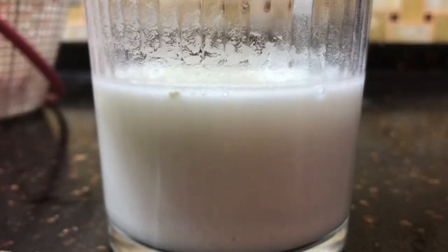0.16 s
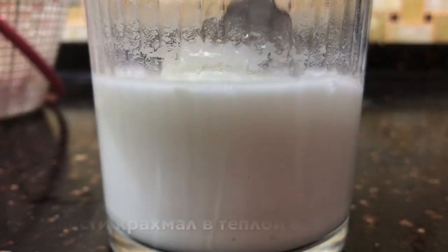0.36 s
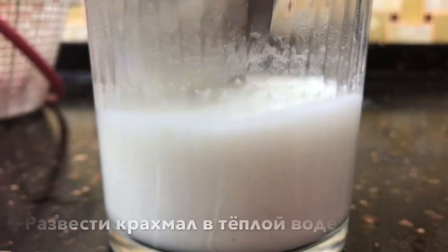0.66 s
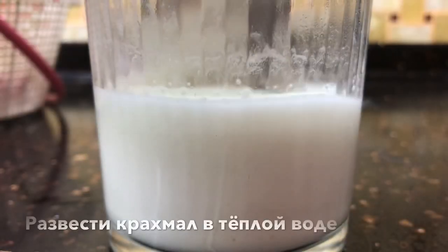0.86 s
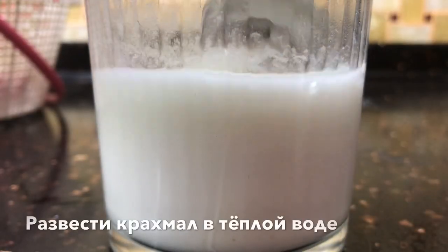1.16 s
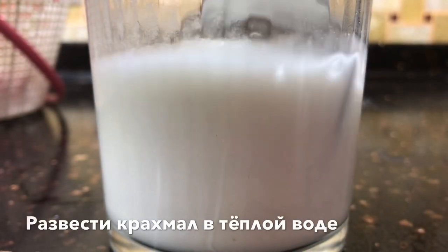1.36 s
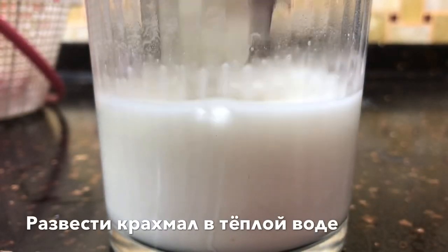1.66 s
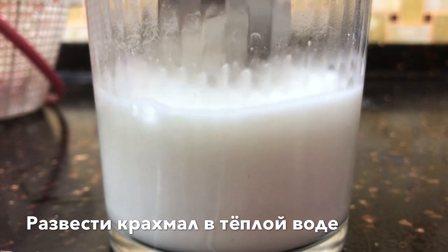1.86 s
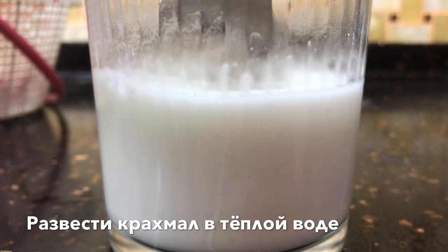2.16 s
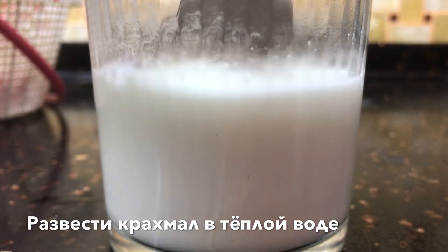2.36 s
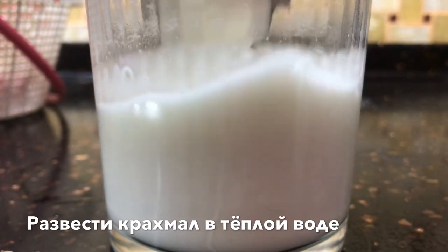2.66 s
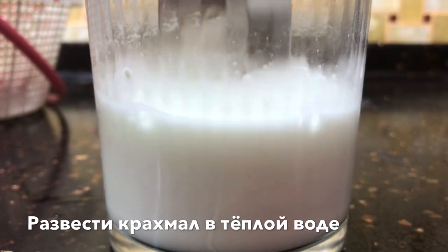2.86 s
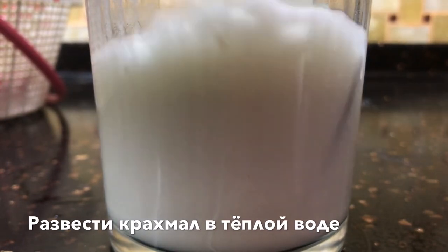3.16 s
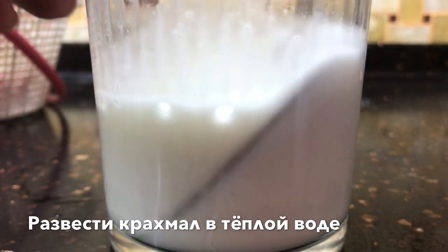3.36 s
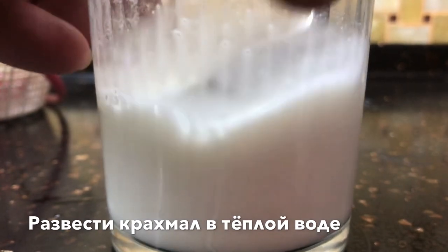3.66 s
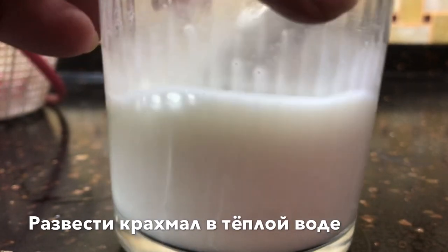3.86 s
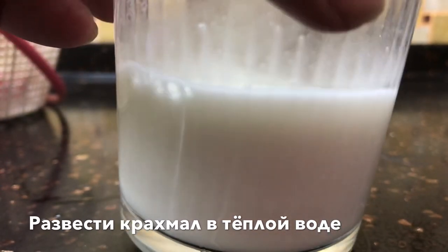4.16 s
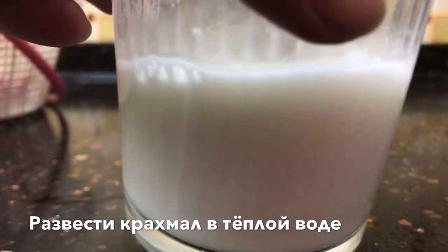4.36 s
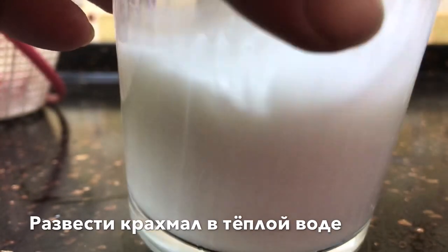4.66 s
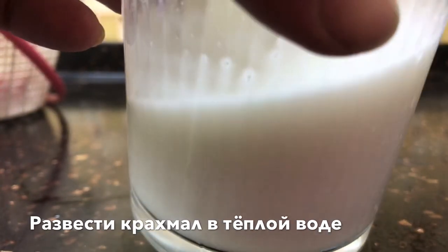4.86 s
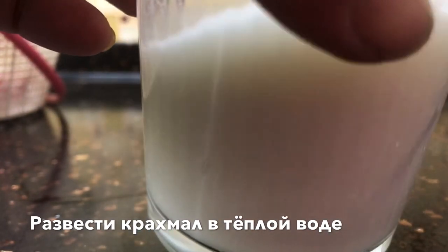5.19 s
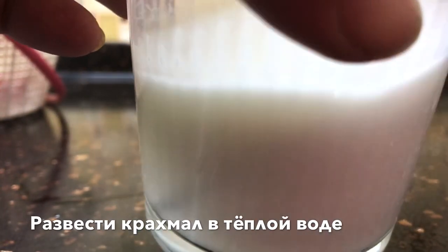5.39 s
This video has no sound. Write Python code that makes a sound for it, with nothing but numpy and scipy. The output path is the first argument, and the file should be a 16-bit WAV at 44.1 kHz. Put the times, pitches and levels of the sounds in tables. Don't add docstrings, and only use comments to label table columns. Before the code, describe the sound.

In a small home kitchen with low rumble, hum and a thin fan hiss, a steel spoon chatters brightly on a glass rim, then strikes the wall hard. Dull wet knocks follow, a cluster of light ticks and a scrape at mid-point, then louder clattering blows and a quick ratchet over the ribbed glass. Close microphone, mostly dry, with a faint room tail.

```python
import sys
import numpy as np
from scipy import signal
from scipy.fft import rfft, irfft, next_fast_len
from scipy.io import wavfile
from scipy.ndimage import uniform_filter1d, map_coordinates

SR = 44100
rng = np.random.default_rng(int(sys.argv[2]) if len(sys.argv) > 2 else 0)


def file_out(sig):
    cols = np.atleast_2d(sig).T
    lim = np.clip(cols, -1, 1)
    pcm = np.round(lim * 32767).astype(np.int16)
    wavfile.write(sys.argv[1], SR, pcm)


def convert_level_to_amplitude(level_db):
    exponent = np.asarray(level_db, float) / 20
    return 10 ** exponent


N = 243828


def unit(x):
    return x / np.sqrt(np.mean(x ** 2) + 1e-20)


def along(points, hz):
    f, v = np.transpose(points)
    return np.interp(np.log(hz + 1), np.log(f + 1), v, left=v[0], right=v[-1])


def curves(rows, silent=None):
    s, *cols = np.transpose(rows)
    t = np.arange(N) / SR
    return [np.interp(t, s, c, left=silent, right=silent) for c in cols]


def wobble(rate):
    knots = rng.standard_normal(int(N * rate / SR) + 4)
    return map_coordinates(knots, [np.arange(N) * rate / SR])


def filtered(x, response):
    m = next_fast_len(N + SR // 2)
    return irfft(rfft(x, m) * response(np.fft.rfftfreq(m, 1 / SR)), m)[:N]


def noise(spectrum):
    low_end, high_end = (spectrum[0][0] / 2, -120), (spectrum[-1][0] * 3, -120)
    closed = [low_end] + list(spectrum) + [high_end]
    return unit(filtered(rng.standard_normal(N), lambda hz: convert_level_to_amplitude(along(closed, hz))))


def resonances(peaks):
    def response(f):
        total = 0
        for k, (centre, width, db) in enumerate(peaks):
            peak = 1j * f * width / (centre * centre - f * f + 1j * f * width)
            total = total + (-1) ** k * convert_level_to_amplitude(db) * peak
        return total
    return response


def add(track, s, sound):
    track[round(s * SR):][:len(sound)] += sound


# (f/Hz, level/dB per Hz)
RUMBLE_COLOUR = [(25, -34), (40, -2), (55, 0.5), (70, 1.5), (81, 9), (92, -5), (110, 1), (130, -29)]
HUM_COLOUR = [(125, -7.5), (167, 1.5), (210, -5), (255, -3.5), (300, -3.5), (340, -12), (370, -4),
              (450, -11.5), (600, -8.5), (740, -18), (1030, -13.5), (1180, -20), (1330, -16.5), (1500, -28)]
HISS_COLOUR = [(1200, -55), (1600, 0), (2300, 0), (3200, 0), (4800, -3), (5300, 1.5), (6800, -1.5),
               (8200, -1), (9000, -0.5), (11500, -1), (13000, -3.5), (14400, -4.5), (15900, -5.5)]
# (f/Hz, width/Hz, level/dB)
FAN_BANDS = [(2210, 153, -8), (5270, 28, -5.5), (5360, 40, -6), (6540, 32, -7.5), (7320, 130, -7),
             (7570, 180, -10), (8050, 205, -7), (8550, 320, -11), (9450, 120, -14), (10200, 160, -13.5),
             (11026, 93.7, 0), (12870, 140, -9.5)]
# (t/s, level/dB)
FAN_WHISTLE = [
    (0, -60.5),
    (3.9, -62),
    (4.2, -70),
    (4.9, -76),
    (5.1, -62),
    (5.53, -67),
]
# (t/s, half-length/s, swell/dB)
GLASS_ROCKS = [
    (3.604, 0.078, 8.5),
    (5.095, 0.1, 5.5),
]


def fan_band(peaks):
    response = resonances(peaks)
    return unit(filtered(rng.standard_normal(N), lambda f: np.abs(response(f)) ** 1.84))


def kitchen_noise():
    t = np.arange(N) / SR
    swell_db = sum(db * np.exp(-((t - s) / half) ** 2) for s, half, db in GLASS_ROCKS)
    rumble_db = -51 + swell_db
    hum_db = -52.5 + 0.45 * swell_db
    rumble = convert_level_to_amplitude(rumble_db + 1.2 * wobble(5)) * noise(RUMBLE_COLOUR)
    hum = convert_level_to_amplitude(hum_db + 0.8 * wobble(7)) * noise(HUM_COLOUR)
    hiss = convert_level_to_amplitude(-63.5) * noise(HISS_COLOUR)

    upper_db, = curves(FAN_WHISTLE)
    lower_db = -67.5 + 2 * np.abs(t - 2.04)
    steady_bands = convert_level_to_amplitude(-67) * fan_band(FAN_BANDS[:8] + FAN_BANDS[11:])
    lower_bands = convert_level_to_amplitude(lower_db - 4) * fan_band(FAN_BANDS[8:10])
    upper_band = convert_level_to_amplitude(upper_db - 7.5) * fan_band(FAN_BANDS[10:11])
    flutter = convert_level_to_amplitude(1.1 * wobble(29.96))
    return rumble + hum + hiss + flutter * (steady_bands + lower_bands + upper_band)


# (f/Hz, t60/s)
KITCHEN_DECAY = [(200, 1), (2000, 0.37), (5000, 0.46), (12000, 0.2)]


def kitchen_echo(x):
    hz, t, z = signal.stft(rng.standard_normal(SR // 2), SR, nperseg=256)
    decay = convert_level_to_amplitude(-60 * t / along(KITCHEN_DECAY, hz)[:, None])
    tail = signal.istft(z * decay, SR, nperseg=256)[1]
    late = np.pad(x, (200, 0))
    diffuse = signal.fftconvolve(late, tail / np.linalg.norm(tail))[:N]
    return convert_level_to_amplitude(-20) * filtered(diffuse, lambda f: 1 / (1 + 1j * f / 3000))


# (t/s of most pressure, rise/s, fall/s, peak level/dB, upper modes/dB)
SLIDES = [
    (1.17, 0.12, 0.21, -51, -10),
    (3.051, 0.076, 0.12, -43, -6.5),
    (3.9, 0.12, 0.27, -68, 8),
    (5.089, 0.15, 0.073, -44, -1.5),
    (5.201, 0.13, 0.11, -48, -12),
]
# (f/Hz, width/Hz, level/dB)
SCRAPED_GLASS = [(504, 140, 2), (790, 90, 1.5), (1055, 130, 6.5), (1370, 120, -14)]
PRESSED_WALL = [(1900, 120, -2), (2910, 59, -4.5), (3300, 246, -9), (4600, 140, -8), (5770, 160, -1)]


def drag():
    grit = rng.standard_normal(N) * convert_level_to_amplitude(3.5 * wobble(260) + 1.8 * wobble(60))
    grains = unit(filtered(grit, lambda hz: 1 / (1 + 1j * hz / 3000) ** 3))
    lower, upper = np.zeros((2, N))
    for s, rise, fall, peak_db, upper_db in SLIDES:
        edge_db = peak_db - 21
        db, = curves([(s - rise, edge_db), (s, peak_db), (s + fall, edge_db)], silent=-120)
        lower += convert_level_to_amplitude(db + 10)
        upper += convert_level_to_amplitude(db + upper_db + 13)
    scrape = filtered(lower * grains, resonances(SCRAPED_GLASS))
    return scrape + filtered(upper * grains, resonances(PRESSED_WALL))


def strike(modes, part_db, life, soft=0.31, lag=0.):
    hz, db, t60 = np.transpose(modes)[..., None]
    t = np.clip(np.arange(SR // 4) / SR - lag / hz, 0, None)
    chance = rng.standard_normal((len(modes), 2))
    scatter_db, detune = 1.5 * chance[:, :1], 1 + 0.004 * chance[:, 1:]
    fade_db = -60 * t / (t60 * np.clip(life, 0.1, 3))
    size = convert_level_to_amplitude(db + part_db[:, None] + scatter_db + fade_db)
    rise = (1 - np.exp(-t * hz / soft)) ** 2
    return (size * rise * np.sin(2 * np.pi * hz * detune * t)).sum(axis=0)


def burst(lo_hz, hi_hz, db, t60):
    t = np.arange(SR // 8) / SR
    puff = rfft(rng.standard_normal(len(t)) * convert_level_to_amplitude(-60 * t / t60))
    flat = puff / uniform_filter1d(np.abs(puff), size=40)
    even = irfft(flat, len(t)) * convert_level_to_amplitude(-30 * t / t60)
    band = signal.butter(3, [lo_hz, hi_hz], "bandpass", fs=SR, output="sos")
    sound = signal.sosfilt(band, even)
    return np.pad(convert_level_to_amplitude(db) * sound / np.abs(sound).max(), (0, SR // 4 - len(t)))


def push(hz, db):
    cycles = np.arange(SR // 50) / SR * hz
    return convert_level_to_amplitude(db) * np.sin(2 * np.pi * cycles) * cycles ** 2 * np.exp(-3 * cycles)


# (t/s, peak level/dB, counter/dB, bright/dB)
FLOOR_THUDS = [
    (0.827, -28, -2.5, -40),
    (0.835, -33.5, 4, -32),
    (1.07, -23, 6.5, -56),
    (1.711, -26, -28, -27),
    (2.93, -28, 13, -46),
    (3.612, -30.5, -10, -34),
    (5.326, -44, 8, -29),
    (5.344, -39.5, 8, -28),
]
# (t/s, peak level/dB, rim ring/dB, bright/dB)
SURFACE_TICKS = [(3.036, -38.5, -10, -42), (3.087, -37, -6, -14), (3.158, -39, -2.5, -18),
                 (3.18, -44, -1, -22), (3.232, -46, -1.5, -18), (3.259, -44.5, 1, -21),
                 (3.281, -41, -13, -30), (3.311, -38.5, -4.5, -22), (3.339, -33.5, -6.5, -33),
                 (3.682, -57, -4, 3.5), (4.166, -54.5, -19, 4.5), (4.351, -48.5, -10, -11),
                 (4.373, -46.5, -2.5, -11), (4.419, -42, -4.5, -10), (4.444, -47, -11, -14),
                 (4.468, -44.5, -25, -23)]
# (t/s, peak level/dB)
RIB_KNOCKS = [(5.052, -31), (5.069, -28.5), (5.086, -33), (5.104, -36), (5.124, -29.5), (5.142, -26),
              (5.158, -28.5), (5.177, -24), (5.192, -25), (5.207, -28.5), (5.221, -36), (5.233, -33.5),
              (5.249, -40), (5.266, -43), (5.285, -55)]


def wet_contacts():
    contacts = []
    for s, db, counter_db, bright_db in FLOOR_THUDS:
        contacts.append((s, db, counter_db, bright_db + 6.5, bright_db, 0.57))
    for s, db, ring_db, bright_db in SURFACE_TICKS:
        contacts.append((s, db, -10, ring_db, bright_db, 0.81))
    for s, db in RIB_KNOCKS:
        sunk_db = 67 * (s - RIB_KNOCKS[0][0])
        contacts.append((s, db, -11, -15, -13 - sunk_db, 0.75))
    return sorted(contacts)


# (f/Hz, level/dB, t60/s)
WET_MODES = [(73.2, -12, 0.18), (242, -13, 0.018), (285, 6, 0.021), (516, -1, 0.076), (590, 4, 0.012),
             (743, 9.5, 0.023), (903, 10, 0.013), (1073, 9.5, 0.019), (1250, -2, 0.005), (1476, -2, 0.045),
             (1730, -10, 0.0157), (1833, -1, 0.042), (1884, -3.5, 0.079), (2760, -4, 0.035),
             (3440, -5, .03), (3670, -17, .025), (4470, 0, 0.042), (5394, -5, 0.014), (5870, -8.5, .03)]
WET_PART_BORDERS = (400, 1400, 2100)


def knocks():
    track = np.zeros(N + SR)
    part = np.digitize(np.transpose(WET_MODES)[0], WET_PART_BORDERS)
    for s, db, counter_db, ring_db, bright_db, life in wet_contacts():
        parts = db + np.array([counter_db + 5, -6, ring_db + 4, bright_db])
        ring = strike(WET_MODES, parts[part], life, soft=0.34, lag=0.33)
        slap = burst(250, 1500, db - 9, 0.06 * life)
        click = burst(2300, 6500, parts[-1] - 5, 0.012)
        add(track, s + 0.00104, ring + slap + click)
        add(track, s + 0.00098, push(742, db + 23))
    return track[:N]


# (t/s, peak level/dB, upper modes/dB, top modes/dB, thud/dB)
RIM_CLINKS = [
    (0.6083, -20.5, -10.5, -19.5, -16.5),
    (0.6161, -15, -12.5, -27, -18.5),
    (0.6333, -21.5, -4, -14.5, -12),
    (0.6507, -47.5, -4, -16.5, 9),
]
# (f/Hz, level/dB, t60/s)
RIM_MODES = [(2070, 1.5, 0.021), (1917, 0.5, 0.21), (2200, -1, 0.027), (2780, -21, .03), (3110, -11, 0.024),
             (3556, 2, 0.032), (4640, -8.5, 0.072), (5350, -6, 0.017), (6150, -31, 0.013),
             (8350, -3.5, 0.062), (8960, -5, 0.016), (12900, -14.5, 0.063)]


def clinks():
    track = np.zeros(N + SR)
    part = np.digitize(np.transpose(RIM_MODES)[0], (2100, 7000))
    stops = [row[0] for row in RIM_CLINKS[1:]] + [np.inf]
    for (s, db, upper_db, top_db, thud_db), stop in zip(RIM_CLINKS, stops):
        parts = db + np.array([-3, upper_db, top_db + 0.5])
        life = 0.97 if stop < np.inf else 2.9
        ring = strike(RIM_MODES, parts[part], life)
        after = np.clip(np.arange(len(ring)) / SR + s - stop, 0, None)
        choked = ring * convert_level_to_amplitude(-60 * after / 0.014)
        thud = burst(120, 1660, db + thud_db + 8, 0.065)
        tick = burst(1980, 6500, db + upper_db - 6, 0.012)
        add(track, s, choked + thud + tick)
    return track[:N]


# (t/s, peak level/dB, counter/dB, clatter/dB, crack/dB)
HARD_BLOWS = [
    (1.18, -5, -46, -24, -48),
    (2.883, -22, -15.5, -14, -41),
    (3.099, -23.5, -27, -11, -22),
    (3.558, -23, -29.5, -0.5, -37),
    (3.832, -11, -34, -0.2, -28),
    (4.096, -17.5, -21.5, -3.5, -44),
    (4.213, -8.5, -29.5, 7.5, -25),
    (4.834, -2, -35.5, -0.8, -32.5),
    (4.953, -9, -26.5, 3, -34),
    (5.013, -22, -21.5, -4, -39),
]
# (f/Hz, level/dB, t60/s)
EARLY_SPOTS = [
    [(410, -8, 0.05), (1140, -32, 0.15), (1910, 1, 0.061), (1943, -28.5, 0.29), (2770, -23, 0.13),
     (3380, -21.5, 0.047), (4630, -29.5, 0.12), (5950, -30, 0.017)],
    [(537, 2.5, 0.048), (893, 10.5, 0.016), (1206, 6.5, 0.021), (1876, -2.5, 0.028), (3200, -37, .03),
     (4440, -22, 0.027)],
    [(804, -22, 0.026), (1260, 10.5, 0.017), (1880, -24, .03), (4450, -8.5, 0.01)],
    [(528, -5.5, 0.047), (1040, 1.5, 0.043), (1850, -2.5, 0.039), (2570, 3, 0.014), (3080, -3, 0.015),
     (5050, -6.5, 0.012), (8300, -11.5, 0.026), (9100, -18, .04)],
]
MIDDLE_SPOTS = [
    [(556, -13.5, 0.11), (820, 4.5, 0.019), (994, 2.5, 0.031), (1330, -2, 0.027), (1500, 6, 0.049),
     (1900, -11, 0.24), (2660, -22, 0.034), (3490, -5, 0.025), (4390, -4, 0.02), (5600, -31, 0.026)],
    [(530, -4.5, 0.048), (910, -7.5, 0.036), (1307, 4, 0.035), (1760, 0, 0.038), (2590, -12, 0.033),
     (3050, -22.5, .03), (4170, 1.5, 0.017), (4660, -17.5, 0.0285), (5030, -13, 0.028)],
    [(817, -10, 0.11), (1107, 0, 0.031), (1302, 3.5, 0.031), (1446, -3, 0.059), (1990, -8.5, 0.048),
     (2400, 10, 0.011), (2610, -24, 0.012), (3250, -5, 0.055), (4060, -1, 0.024), (4560, 2.5, 0.013),
     (7900, -18.5, 0.044), (7750, -30, 0.061)],
]
LATE_SPOTS = [
    [(509, -20, 0.18), (1010, 0, 0.038), (1540, -6, 0.055), (1876, 8, 0.026), (1880, -20, 0.23),
     (2490, -33, 0.014), (3120, -16, 0.015), (3730, -0.5, 0.019), (4590, 1, 0.035), (5220, -3.5, 0.025),
     (6040, -12, 0.022), (7780, -9.5, 0.022)],
    [(507, -33, 0.043), (880, -10, 0.099), (1095, 6, 0.026), (1287, 1.5, 0.029), (1400, -7.5, 0.045),
     (1810, -15.5, 0.18), (2400, -31, .05), (3470, -5, 0.036), (4170, 2.5, 0.019), (4770, -3, 0.014),
     (5600, -20, 0.025), (7700, -33, 0.033)],
    [(520, -4, 0.026), (1037, 2.5, 0.045), (1470, -9, 0.038), (1850, -0.5, 0.036), (3380, -7, 0.044),
     (3910, -2, 0.018), (4600, -10, 0.055)],
]


def blows():
    track = np.zeros(N + SR)
    counter = WET_MODES[:3]
    spots = EARLY_SPOTS + MIDDLE_SPOTS + LATE_SPOTS
    for (s, db, counter_db, clatter_db, crack_db), spot in zip(HARD_BLOWS, spots):
        modes = [(hz, level, min(t60, 0.35)) for hz, level, t60 in spot]
        life = 0.34 - 0.03 * db
        ring = strike(modes, np.full(len(modes), db - 6.0), life)
        thud = strike(counter, np.full(len(counter), db + counter_db + 19.5), 0.63)
        clatter = burst(300, 4500, db + clatter_db - 9, 0.048)
        crack = burst(4100, 12400, db + crack_db + 12, 0.0059)
        add(track, s + 0.001, ring + thud + clatter + crack)
        add(track, s, push(389, db + 1.5))
    return track[:N]


def scene():
    glass = knocks() + blows() + clinks() + drag()
    background = filtered(kitchen_noise(), lambda hz: hz < 15750)
    return (glass + kitchen_echo(glass) + background)[None]


def roll_off(x):
    return signal.sosfilt(signal.butter(12, 16690, fs=SR, output="sos"), x)


def record(dry):
    ceiling = 0.95
    held = dry[0] / (1 + np.abs(dry[0] / ceiling) ** 8) ** (1 / 8)
    heard = filtered(held, lambda hz: (hz < 16500) * (1j * hz / (45 + 1j * hz)) ** 2)
    return roll_off(heard[None])


dry = scene()
out = record(dry)
file_out(out)
```